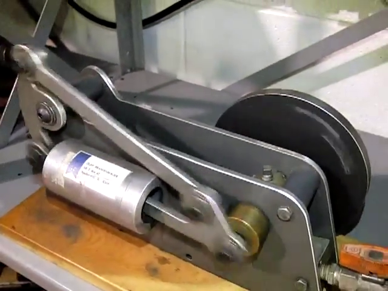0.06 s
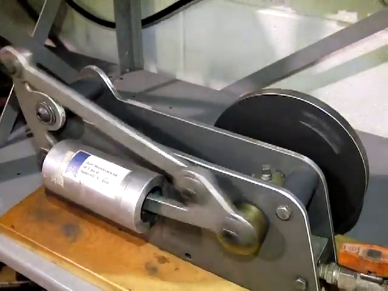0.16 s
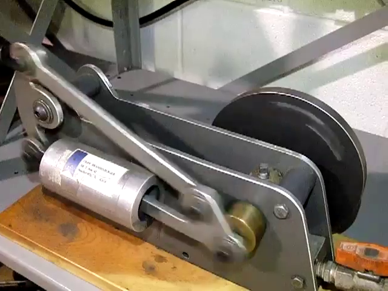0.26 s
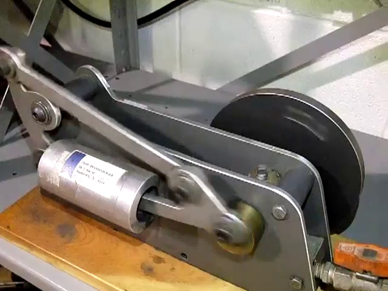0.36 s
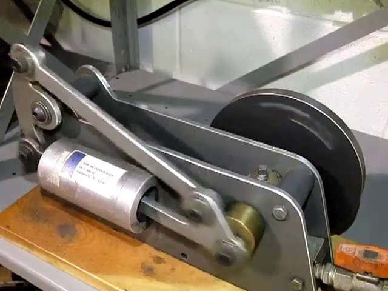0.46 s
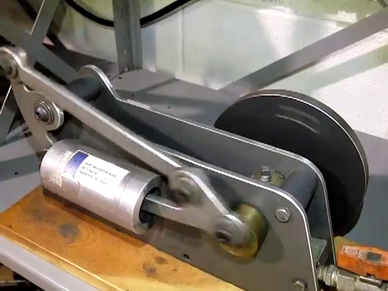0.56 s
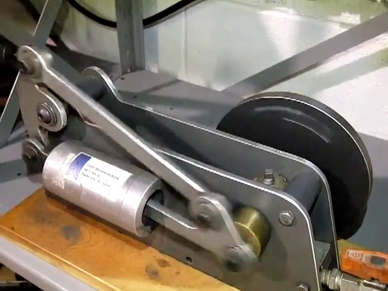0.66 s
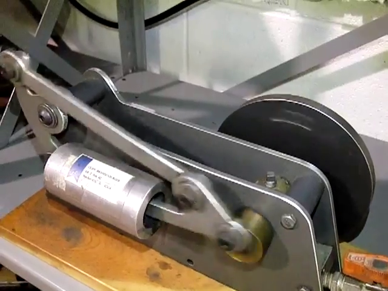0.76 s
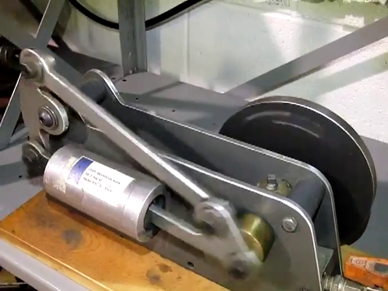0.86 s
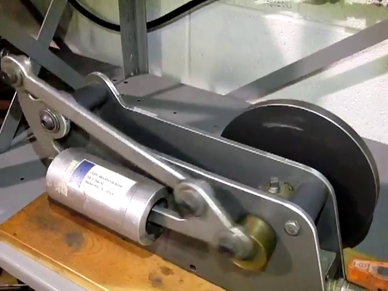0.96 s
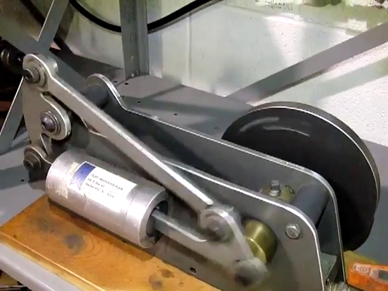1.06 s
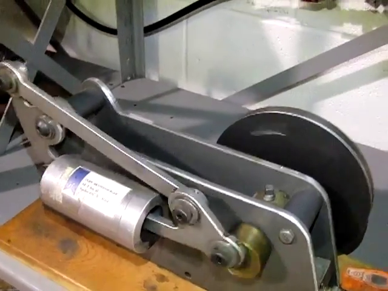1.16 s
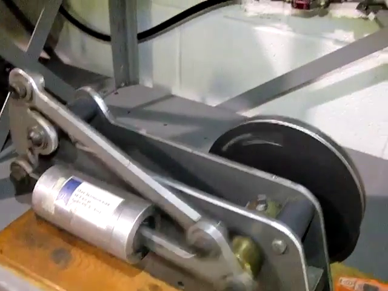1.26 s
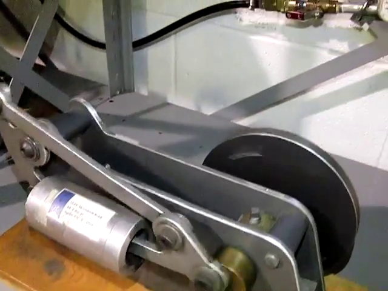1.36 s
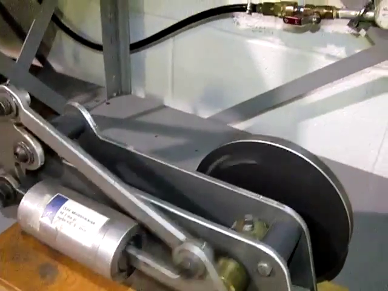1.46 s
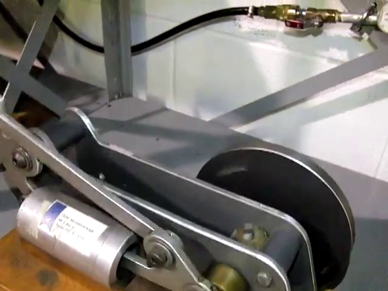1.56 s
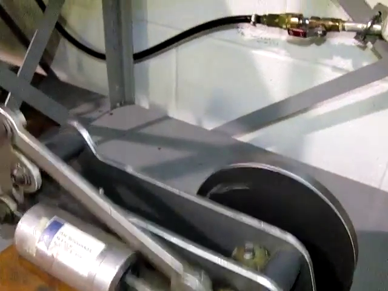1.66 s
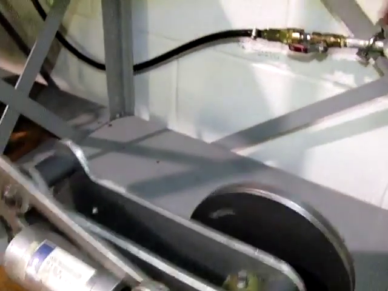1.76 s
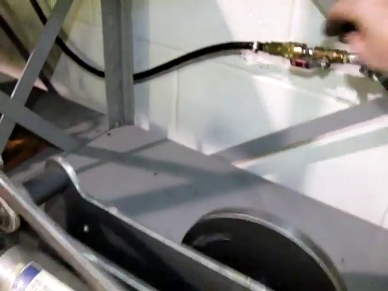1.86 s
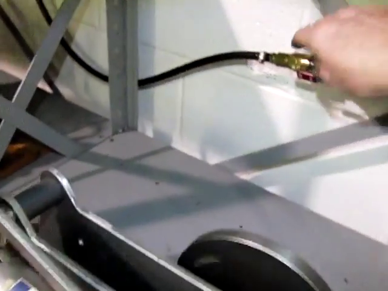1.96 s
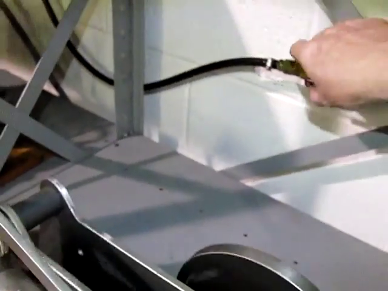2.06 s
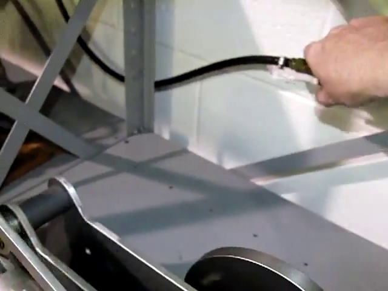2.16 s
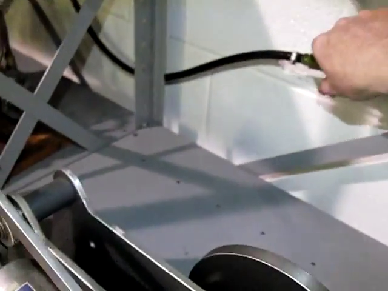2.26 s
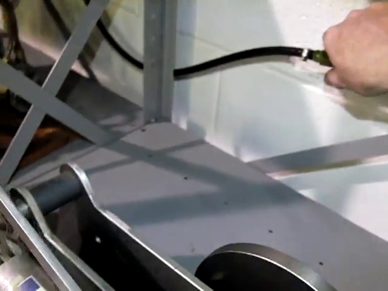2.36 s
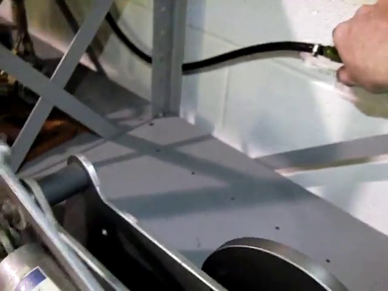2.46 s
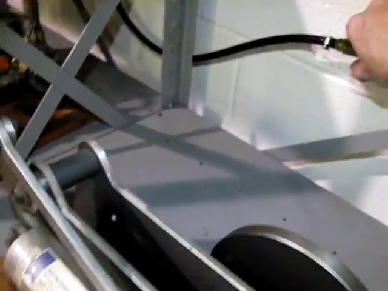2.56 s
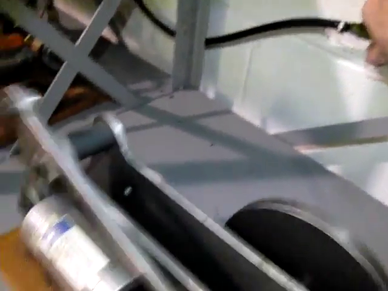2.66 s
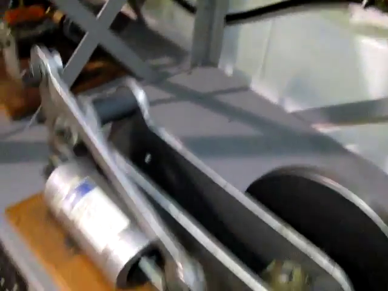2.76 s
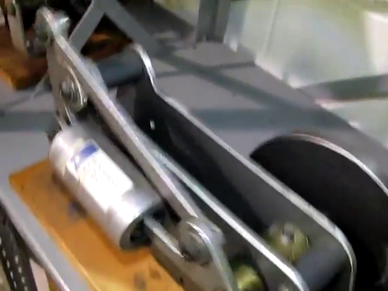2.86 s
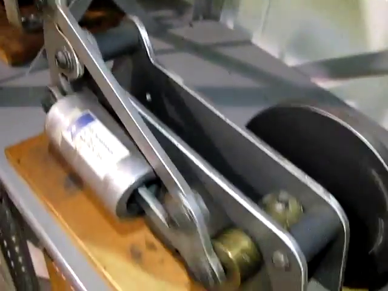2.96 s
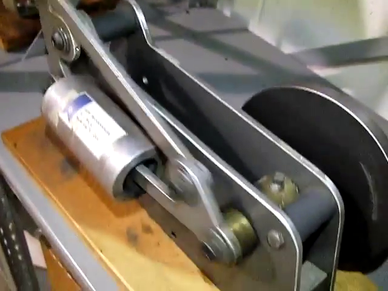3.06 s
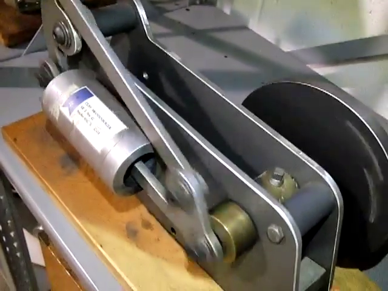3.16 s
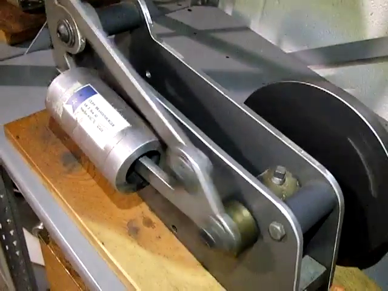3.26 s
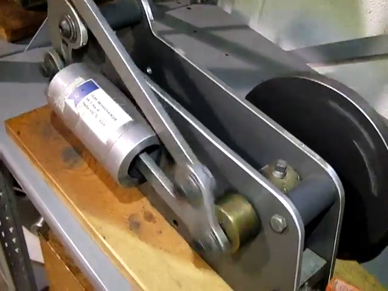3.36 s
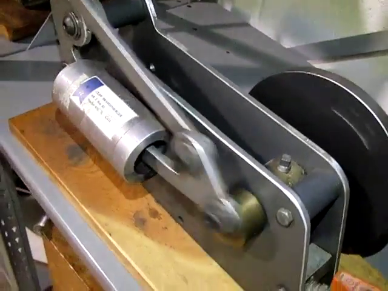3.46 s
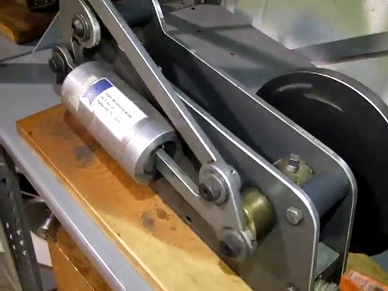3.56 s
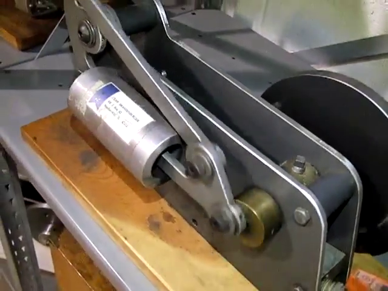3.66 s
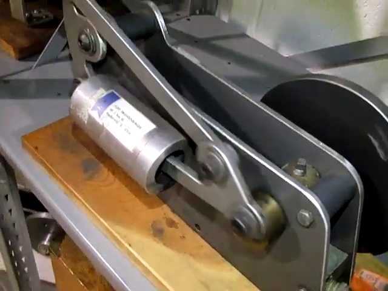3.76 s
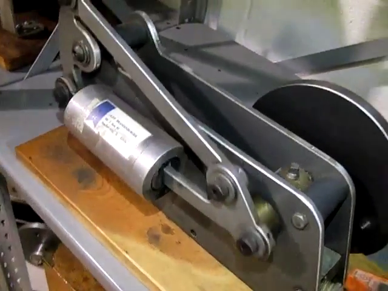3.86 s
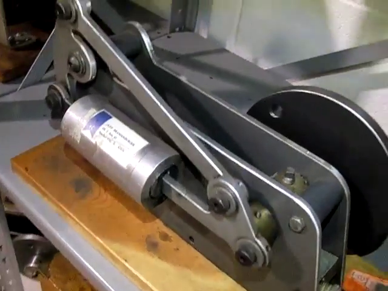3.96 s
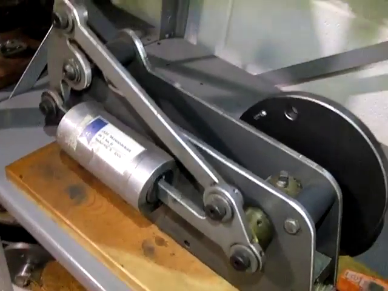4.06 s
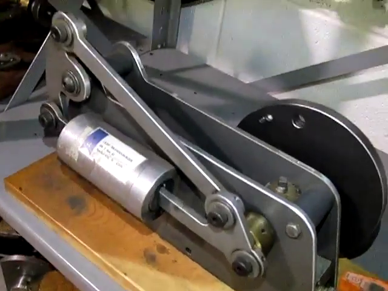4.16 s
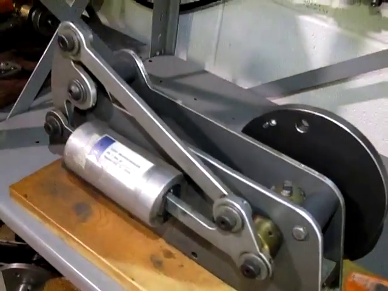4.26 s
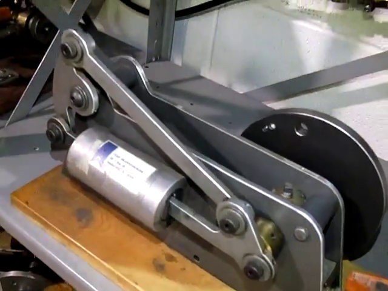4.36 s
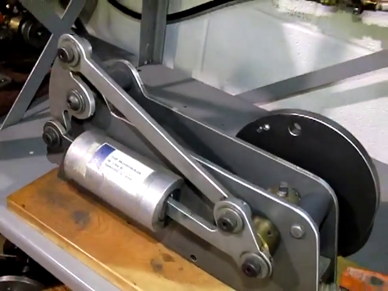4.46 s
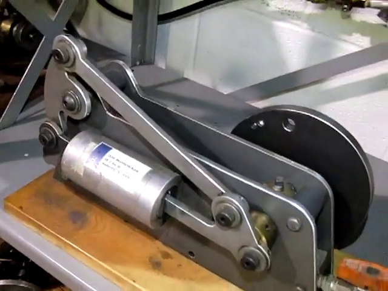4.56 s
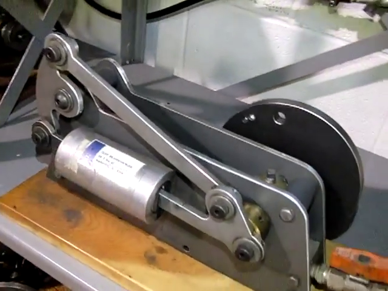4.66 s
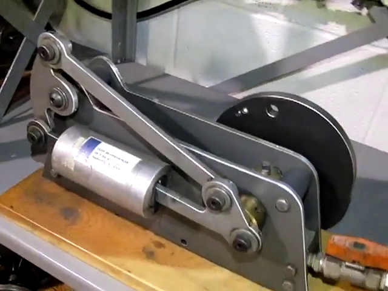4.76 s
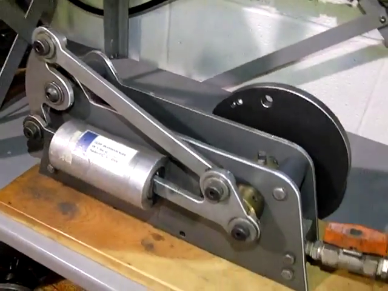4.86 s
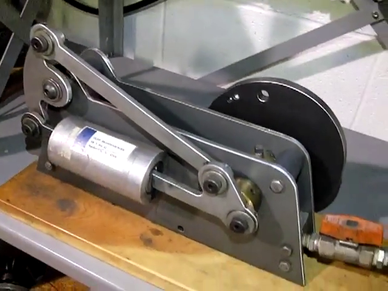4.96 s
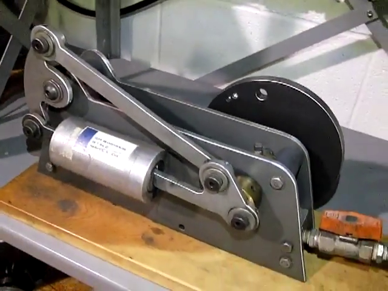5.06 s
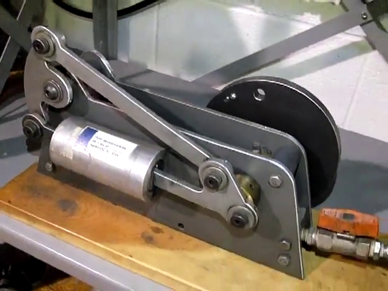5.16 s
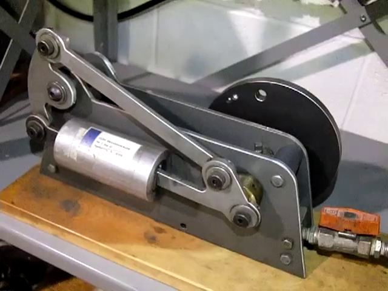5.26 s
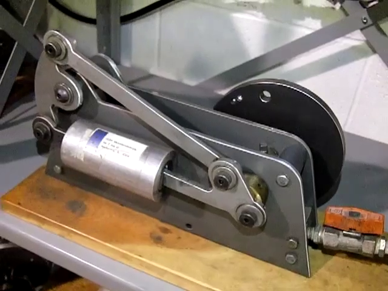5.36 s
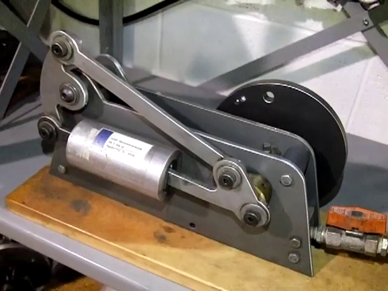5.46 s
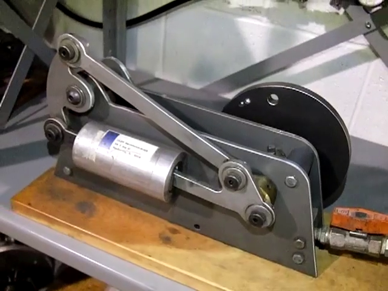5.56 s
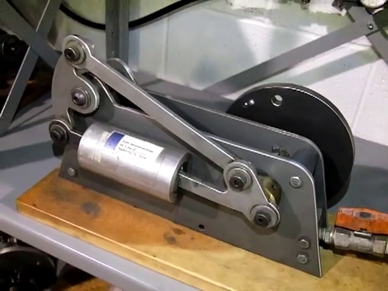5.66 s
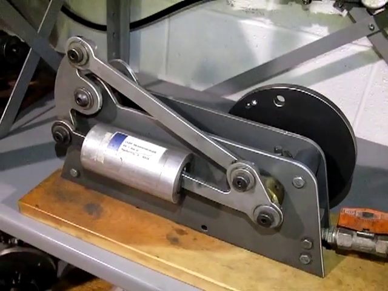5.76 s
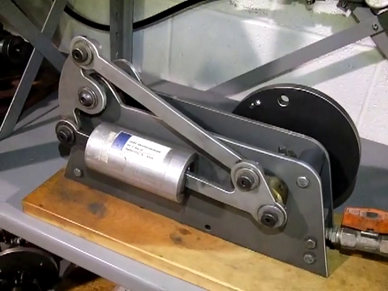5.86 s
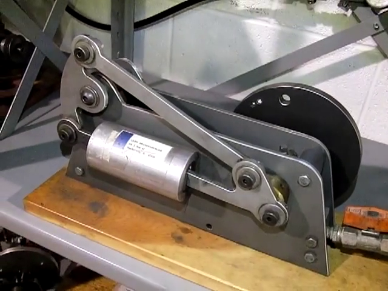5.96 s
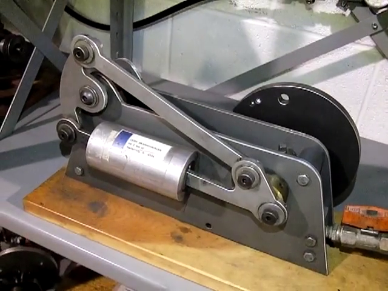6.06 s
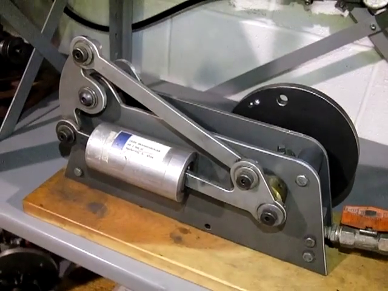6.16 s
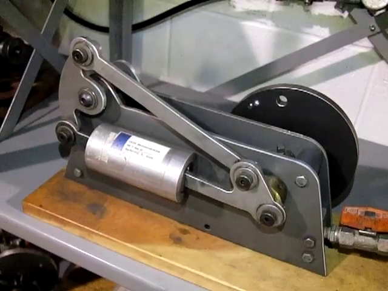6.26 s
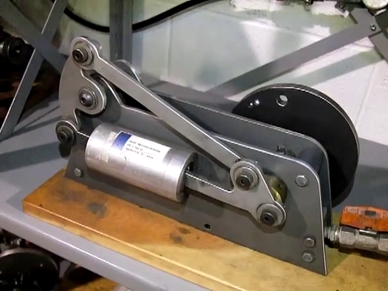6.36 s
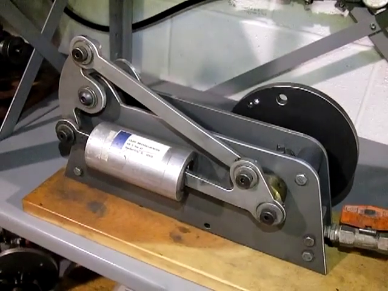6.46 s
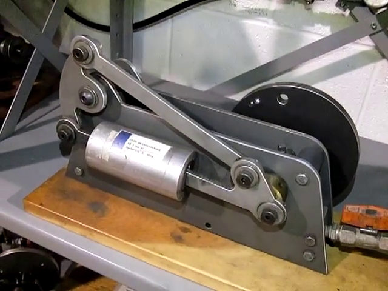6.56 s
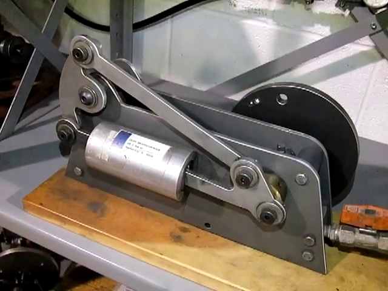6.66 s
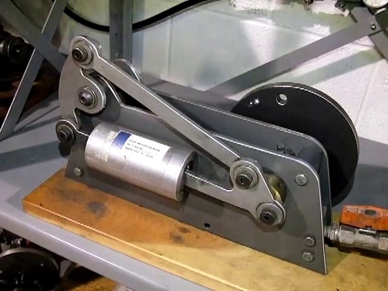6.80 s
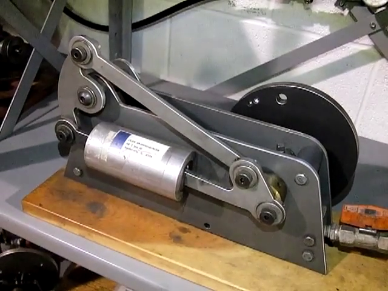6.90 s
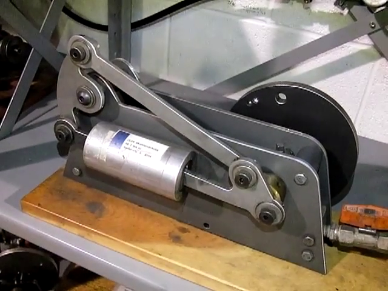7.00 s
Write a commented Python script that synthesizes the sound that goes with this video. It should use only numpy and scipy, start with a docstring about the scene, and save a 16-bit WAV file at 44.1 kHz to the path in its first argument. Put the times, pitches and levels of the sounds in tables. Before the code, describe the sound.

Close up in a small workshop, a single-cylinder air engine runs on a wooden bench, its loose steel linkage clattering almost five turns a second with rhythmic hisses and low bearing rumble. Around three and a half seconds the air is shut off; uneven knocks slow to a stop, a soft sigh escapes, then faint metal ticks sound over ventilation hum.

```python
"""In a humming workshop, a small single-cylinder air engine runs on a wooden bench, nearly five turns a second.
Each turn: a chattering blow of the loose linkage and lighter knocks, built from ringing steel and bench modes,
and hiss from valve and exhaust, built from coloured noise and breathy tones that the crank opens and closes.
The air is shut off, the flywheel coasts to rest with a few knocks, and a small steel part ticks (damped modes).
Bearings rumble, the bench drones, surfaces and walls answer; ventilation, lamp buzz and a thin whine go on."""
import sys
import numpy as np
from scipy import signal
from scipy.fft import rfft, irfft, next_fast_len
from scipy.io import wavfile
from scipy.ndimage import uniform_filter1d, map_coordinates

SR = 44100
rng = np.random.default_rng(int(sys.argv[2]) if len(sys.argv) > 2 else 0)


def wav_record(signal):
    """Record a signal, one row per channel, as 16-bit PCM in the file named by sys.argv[1]."""
    frames = np.transpose(np.atleast_2d(signal))
    bounded = np.clip(frames, -1, 1)
    # unit amplitude maps onto the largest positive 16-bit level
    quanta = np.round(bounded * 32767).astype(np.int16)
    wavfile.write(sys.argv[1], SR, quanta)


N = 310023

# the steady run: start of the first power stroke, length of a turn, full turns under air
FIRST_S, TURN_S, TURNS = -0.0123, 0.20663, 17
# the slowing flywheel: [t/s, turns past the steady run]
COAST_TURNS = [(3.601, 0.42), (3.705, .765), (3.78, 1), (3.83, 1.26), (4.03, 1.32)]
# knocks of every turn; the rod bounces once, the valve link also ticks twice:
# [joint, crank position/turn, level/dB, timing scatter/s]
TURN_KNOCKS = [("stroke", 0, 2.1, .0001), ("valve", .238, -15, .001), ("valve", .304, 1.8, .0002),
               ("rod", .427, -.3, .0007), ("rod", .53, -10.5, .0007), ("valve", .93, -15, 0.00101)]
BEAT_SCATTER_DB = .5  # from turn to turn
# knocks of the run-down: [joint, t/s, level/dB]
COAST_KNOCKS = [("stroke", 3.5035, .5), ("valve", 3.556, 5.3), ("rod", 3.602, 0), ("rod", 3.7415, -8),
                ("rod", 3.78, -9.5), ("rod", 3.825, -3.5), ("rod", 4.0325, -8)]
# contacts within a knock, as the play in the joint closes: [t/s from the knock's start, level/dB]
STROKE_CONTACTS = [(-.0014, -10.5), (.0002, -1.3), (.0022, 1.1), (.0047, -1), (.0089, -2.7), (.0103, 1.6),
                   (.0117, -4)]
VALVE_LINK_CONTACTS = [(0, 1), (.0037, -13.5)]
ROD_JOINT_CONTACTS = [(0, -4.3), (.003, -2.5)]
# ringing steel frame and links: [f/Hz, t60/s, stroke level/dB, valve link level/dB, rod level/dB]
FRAME_MODES = [(378.6, 0.095, -36.5, -32, -43), (436, 0.062, -36.5, -38, -31.5),
               (526, 0.074, -29, -26.5, -34), (670, 0.02, -37, -51, -22.5), (665, 0.078, -20.5, -34, -24.5),
               (707, 0.04, -45, -33.5, -26), (845, 0.038, -26.5, -24.5, -61), (956, 0.039, -19, -41, -27),
               (1131, 0.028, -33, -34, -19.5), (1230, 0.032, -26, -25, -25),
               (1309, 0.035, -15.5, -30.5, -21), (1391, 0.019, -19, -17, -18.5),
               (1578, 0.02, -38, -19.5, -29), (1756, 0.036, -22, -22, -22), (1815, 0.043, -17, -49, -20),
               (2050, 0.02, -24, -19, -27.5), (2147, 0.014, -16.5, -25, -43), (2190, 0.0083, -57, -43, -84),
               (2800, .02, -101, -54, -61), (3570, 0.027, -51, -29, -36)]
# the bench under the engine: [f/Hz, t60/s, stroke level/dB, valve link level/dB, rod level/dB]
BENCH_MODES = [(47.7, 0.1, -35, -52, -34), (93, 0.11, -68, -64, -64), (141.6, 0.18, -30, -46, -53),
               (207.2, 0.13, -25.5, -40, -33), (230, 0.066, -30, -80, -41), (256, 0.1, -26.5, -54, -39),
               (335.3, 0.3, -45, -61, -45)]

SHUT_S = 3.43  # the supply is shut and the pressure bleeds away
BLEED_DB_PER_S = 42  # how fast the leak and the singing die away
# air let through in every turn by drive stroke, valve changeover, return stroke and exhaust:
# [opens at/turn, rise/turns per 20 dB, hold/turns, fall/turns per 20 dB, bleed/dB per s,
#  valve hiss level/dB, inlet fizz level/dB, exhaust jet level/dB]
AIR_PUFFS = [(0.002, 0.06, .15, .14, 52, -23.8, -30.5, -48), (.425, .032, 0.014, .048, -3, -30.5, -33, -42),
             (0.639, .17, 0.21, 0.07, 30, -28.5, -48, -35.5), (.759, .055, .008, .045, 18, -36, -43, -16.3)]
# air that leaks between the puffs: [valve hiss level/dB, inlet fizz level/dB, exhaust jet level/dB]
LEAK_LEVELS = (-39.5, -52.5, -58)
# colours of valve hiss, inlet fizz and exhaust jet: [f/Hz, relative level/dB per Hz]
HISS_COLOUR = [(300, -31), (950, -19.5), (1400, -6), (2300, -9.5), (3200, 0), (3900, -3), (4500, -14),
               (4850, -18.5), (5200, -19), (7500, -46), (15000, -48)]
INLET_COLOUR = [(600, -26), (1400, -33), (2500, 0.5), (4400, -6), (5200, -4.5), (7600, -10), (9300, -4.5),
                (10000, 0.5), (10500, 7), (11300, 4), (12600, -0.5), (15500, -10.5)]
JET_COLOUR = [(800, -45), (1350, -5.5), (1700, -10), (3600, -9.5), (4500, -14.5), (5200, -15.5),
              (6500, -18.5), (7400, -20.5), (8700, -16.5), (10000, -11), (11100, -0.5), (12200, -17),
              (13300, -7.5), (15500, -25)]
# resonances of the exhaust hole, where the jet whistles: [f/Hz, width/Hz, relative level/dB]
WHISTLE_MODES = [(3720, 310, -4.5), (6000, 83, -7), (11060, 580, -3.5)]
# the air column in the cylinder sinks in pitch during each stroke:
# [from/turn, length/turns, start f/Hz, end f/Hz, level/dB]
COLUMN_GLIDES = [(.01, .28, 2400, 2245, -34.5), (.54, .28, 2495, 1750, -30.5)]
# the valve slot sings upward on the drive stroke, downward on the return:
# [from/turn, length/turns, start f/Hz, end f/Hz, level/dB]
SLOT_GLIDES = [(.1, .16, 4135, 4455, -33), (.62, .32, 4056, 3405, -34)]
# the last air sighs out of the cylinder:
# [t/s, rise/s per 20 dB, hold/s, fall/s per 20 dB, valve hiss level/dB, inlet fizz level/dB]
LAST_SIGH = (3.87, 0.3, .045, .07, -44, -49.5)

# the bearings fall quiet as the flywheel slows: [from t/s, fade/dB per s]
BEARING_FADE = (3.5, 44)
# colours of the bearings' repeating roughness and chance rumble: [f/Hz, relative level/dB per Hz]
ROUGH_COLOUR = [(25, -16), (48, -12), (80, -6), (140, 1.5), (220, -2.0), (680, -3.0), (950, -5.5),
                (1400, -8), (2400, -12.0), (5000, -51)]
CHANCE_COLOUR = [(25, 1), (50, -15), (200, -2), (700, -6), (2500, -2), (5000, -36)]
# the rocking engine keeps the bench top droning until it slows; level before the engine's closeness gain
DRONE_HZ, DRONE_DB, DRONE_END_S, DRONE_FADE_DB_PER_S = 140.33, -34, 3.65, 54
# a small steel part snaps, rattles and settles: [t/s, level/dB]
TICK_TOUCHES = [(4.8955, -25), (4.898, -29.5), (4.9055, -28), (4.9252, -33), (4.932, -39), (5.569, -48),
                (5.75, -49.5), (6.23, -48)]
# how that part rings: [f/Hz, t60/s, level/dB]
TICK_MODES = [(830, 0.029, -11.5), (990, 0.036, -6), (1400, 0.03, -10), (1830, 0.079, -1.5),
              (2050, 0.047, -1), (2404, 0.042, 3), (2580, 0.052, 3), (3100, 0.053, -2), (3500, 0.044, -8),
              (5970, .02, -22), (11300, .04, -18)]

# the engine comes closer to the ear: [t/s, level/dB]
CLOSER = [(0, -1.44), (1.7, -1.44), (2.3, 0), (3.3, 1.7)]
# hard surfaces beside the engine: [delay to left/s, delay to right/s, level/dB]
SURFACES = [(.0007, .0011, -21), (.0019, .0014, -21), (.0031, .0025, -22)]
# how long the workshop's walls answer: [f/Hz, t60/s]
WALL_DECAY = [(150, 0.21), (1500, 0.04), (10000, 0.066)]
WALLS_DB, SWAYS_PER_S = -12, 4  # the room's answer, and how fast it shifts

# workshop ventilation: [f/Hz, relative level/dB per Hz]
VENT_COLOUR = [(20, -10), (42, 8.5), (62, -1), (105, 1), (140, -6), (220, -9), (300, -15), (480, -21.5),
               (900, -23), (1500, -25.5), (2400, -27.5), (4000, -31.5), (15500, -36)]
# swell of the ventilation's rumble: [t/s, level/dB]
RUMBLE_SWELL = [(0, -56), (4.5, -51), (6.5, -48.5), (6.8, -42.5)]
# colour of that rumble: [f/Hz, relative level/dB per Hz]
RUMBLE_COLOUR = [(40, -21), (70, -2.5), (110, 4.5), (135, -25.5), (220, -38), (1000, -82)]
HUM_HZ = 120.03  # first harmonic of hum and buzz
# transformer hum and lamp buzz: [harmonic number, level/dB]
HUM_HARMONICS = [(1, -54), (2, -64), (3, -49), (4, -72.5), (10, -64.5), (12, -74), (14, -64), (15, -66),
                 (16, -65.5), (17, -67), (18, -70.5), (19, -64), (21, -70.5)]
# a thin electrical whine: [f/Hz, level/dB]
THIN_WHINE = (15734, -68)

# the two microphone ports: [f/Hz, phase of left behind right/rad, left minus right level/dB]
PORT_DIFFERENCE = [(60, 0.032, -1), (200, 0.16, 0), (430, 0.5, 0.5), (680, 0.4, 2), (1226, 1.81, 1.5),
                   (1920, 2.035, -3), (3800, 2.608, -0.5), (11000, 2.64, -2)]
# dips in the microphone's response: [f/Hz, width/Hz]
MIC_DIPS = [(2840, 606), (2890, 80), (5000, 110)]
TOP_HZ = 15800  # nothing passes from here up


def linkage():
    """Three joints knock as they take up play: a stroke blow a turn, a valve knock with two ticks, a rod with a bounce."""
    stroke = knocks(blows("stroke"), STROKE_CONTACTS, axis=2)
    valve = knocks(blows("valve"), VALVE_LINK_CONTACTS, axis=3)
    rod = knocks(blows("rod"), ROD_JOINT_CONTACTS, axis=4)
    return stroke + valve + rod


def blows(joint):
    """(s, dB) of one joint's knocks: nearly the same crank positions in every turn, then the run-down."""
    events = []
    for name, turn, db, scatter_s in TURN_KNOCKS:
        if name != joint:
            continue
        for k in range(TURNS):
            s = FIRST_S + (k + turn) * TURN_S + scatter_s * rng.normal()
            events.append((s, db + BEAT_SCATTER_DB * rng.normal()))
    return events + [(s, db) for name, s, db in COAST_KNOCKS if name == joint]


def knocks(events, contacts, axis):
    """Each knock is a few quick contacts on the frame and one push on the bench, nearly alike from turn to turn."""
    out = np.zeros(N)
    for s, db in events:
        steel = ring(FRAME_MODES, axis, seconds=1 / 8, attack=0.00031, scatter_db=1.23)
        for delay, contact_db in contacts:
            late, harder_db = rng.normal(0, [.00004, .6])
            add(out, s + delay + late, amp(db + contact_db + harder_db) * steel)
        bench = ring(BENCH_MODES, axis, seconds=.5, attack=0.0012, scatter_db=0.5)
        add(out, s, amp(db) * bench)
    return out


def ring(modes, axis, seconds, attack, scatter_db):
    """Damped modes after one contact; axis picks the level column, and each pitch shifts a little."""
    t = np.arange(int(seconds * SR)) / SR
    table = np.transpose(modes)[:, :, None]
    strength, detune = rng.standard_normal((2, len(modes), 1))
    level = table[axis] + scatter_db * strength
    hz = table[0] * (1 + .005 * detune)
    decay = amp(level - 60 * t / table[1])
    return np.sum(decay * np.sin(2 * np.pi * hz * t), 0) * (1 - np.exp(-t / attack))


def crank():
    """Position of the crank within its turn, 0-1: even speed, then coasting."""
    running = [(FIRST_S, 0), (FIRST_S + TURNS * TURN_S, TURNS)]
    coasting = [(s, TURNS + turns) for s, turns in COAST_TURNS]
    return curve(running + coasting) % 1


def air():
    """The crank opens the ports in turn: turbulent inlet, valve and exhaust flow, and singing cavities."""
    angle = crank()
    supply = fading(SHUT_S, BLEED_DB_PER_S)
    valve_flow, inlet_flow, jet_flow = flows(angle, supply)
    hiss = valve_flow * patchy(noise(HISS_COLOUR), depth_db=3.0)
    inlet = inlet_flow * amp(1.2 * wobble(90)) * noise(INLET_COLOUR)
    singing = glides(angle, COLUMN_GLIDES, width_hz=200) + glides(angle, SLOT_GLIDES, width_hz=200)
    return hiss + inlet + exhaust(jet_flow) + supply * singing


def flows(angle, supply):
    """Gains of valve, inlet and jet: the powers of the leak and the four puffs add up."""
    power = np.outer(amp(LEAK_LEVELS), supply) ** 2
    for opens, rise, hold, fall, bleed, *levels_db in AIR_PUFFS:
        since = (angle - opens + .5) % 1 - .5  # turns since opening, wrapped to the nearest
        opening = puff(since, rise, hold, fall)
        power = power + np.outer(amp(levels_db), opening * fading(SHUT_S, bleed)) ** 2
    return np.sqrt(power)


def exhaust(jet_flow):
    """A jet of noise excites the exhaust hole, whose whistle grows with the square of the flow."""
    flow = jet_flow * amp(0.4 * wobble(60))

    def hole(f):
        return sum(amp(db) * 1j * f * w / (c * c - f * f + 1j * f * w) for c, w, db in WHISTLE_MODES)

    whistle = unit(filtered(rng.standard_normal(N), hole)) * flow ** 2 / flow.max()
    return flow * noise(JET_COLOUR) + amp(-3.5) * whistle


def puff(since, rise, hold, fall):
    """Attack, hold and release of an opening; rise and fall are the spans of a 20 dB change."""
    before = np.maximum(-since, 0) / rise
    after = np.maximum(since - hold, 0) / fall
    return amp(-20 * (before + after))


def patchy(x, depth_db):
    """Turbulence: short patches of a few hundred hertz swell and fade."""
    z = signal.stft(x, nperseg=512)[2]
    field = uniform_filter1d(rng.standard_normal(z.shape), size=3, axis=0)
    field = uniform_filter1d(field, size=4, axis=1)
    return unit(signal.istft(z * amp(depth_db * unit(field)), nperseg=512)[1][:N])


def glides(angle, rows, width_hz):
    """Breathy tones that swell and fade once a turn while their pitch bends ever faster."""
    out = np.zeros(N)
    for start, length, start_hz, end_hz, db in rows:
        u = np.clip((angle - start) / length, 0, 1)
        hz = (start_hz + (end_hz - start_hz) * u ** 2) * (1 + .02 * wobble(4.8))
        out += amp(db) * np.sin(np.pi * u) * narrow(hz, width_hz)
    return out


def narrow(hz, width_hz):
    """A breathy tone that follows a pitch curve: two carriers in quadrature, each with a random envelope."""
    phase = 2 * np.pi * np.cumsum(hz) / SR
    return wobble(width_hz) * np.cos(phase) + wobble(width_hz) * np.sin(phase)


def sigh():
    """What air is left escapes through valve and inlet as the piston comes to rest."""
    s, rise, hold, fall, hiss_db, inlet_db = LAST_SIGH
    breath = amp(hiss_db) * noise(HISS_COLOUR) + amp(inlet_db) * noise(INLET_COLOUR)
    return puff(np.arange(N) / SR - s, rise, hold, fall) * breath


def bearings():
    """The same rough surfaces pass every turn, loudest under the power stroke, over some chance rumble."""
    angle = crank()
    surface = noise(ROUGH_COLOUR)
    repeating = map_coordinates(surface, [SR + angle * TURN_S * SR])  # the same stretch read every turn
    load_db = 3.3 * np.cos(2 * np.pi * (angle - .2))
    rumble = amp(-41.5) * noise(CHANCE_COLOUR)
    return fading(*BEARING_FADE) * amp(load_db) * (amp(-32.5) * repeating + rumble)


def drone():
    """The bench's main resonance, kept going in step with the strokes."""
    t = np.arange(N) / SR - FIRST_S
    level = fading(DRONE_END_S, DRONE_FADE_DB_PER_S) * amp(DRONE_DB + 0.61 * wobble(19))
    return np.sqrt(2) * level * np.sin(2 * np.pi * DRONE_HZ * t)


def tick():
    """Each touch of the small part is a short crack of noise and a brief ring of its modes."""
    t, out = np.arange(SR // 8) / SR, np.zeros(N)
    for s, db in TICK_TOUCHES:
        metal = ring(TICK_MODES, axis=2, seconds=1 / 8, attack=.0003, scatter_db=1.2)
        crack = amp(db - 12 - 60 * t / 0.017) * rng.standard_normal(len(t))
        add(out, s, amp(db - 3.5) * metal)
        add(out, s, crack)
    return out


def fading(start_s, db_per_s):
    """Gain of an engine sound: follows the closeness of the engine, and dies away from start_s on."""
    return amp(curve(CLOSER) - db_per_s * np.maximum(np.arange(N) / SR - start_s, 0))


def nearby(x):
    """Quick reflections that reach the two ports at different moments."""
    def echoes(hz):
        return sum(amp(db) * np.exp(-2j * np.pi * np.outer([left, right], hz))
                   for left, right, db in SURFACES)

    return filtered(x, echoes)


def walls(x):
    """The workshop's short answer: decaying noise, different at each port, that starts 5 ms late."""
    hz, t, z = signal.stft(rng.standard_normal((2, SR // 2)), SR, nperseg=256)
    decay = amp(-60 * t / along(WALL_DECAY, hz)[:, None])
    tail = signal.istft(z * decay, SR, nperseg=256)[1]
    tail = np.pad(tail, ((0, 0), (SR // 200, 0)))
    return signal.fftconvolve(x[None], tail / np.linalg.norm(tail[0]), axes=1)[:, :N]


def reflections(engine):
    """Surfaces and walls answer the engine above its bass; the wall answer sways between two tails."""
    above_bass = filtered(engine, lambda hz: hz ** 2 / (hz ** 2 + 400 ** 2))
    sway = 2 * wobble(SWAYS_PER_S)
    far = walls(above_bass * np.cos(sway)) + walls(above_bass * np.sin(sway))
    return nearby(above_bass) + amp(WALLS_DB) * far


def ventilation():
    """Moving air as coloured noise that wavers in level, over a low rumble that swells."""
    vent = amp(-44.5 + 1.6 * wobble(6.6)) * noise(VENT_COLOUR)
    return vent + amp(curve(RUMBLE_SWELL)) * noise(RUMBLE_COLOUR)


def diffuse_air():
    """Ventilation noise from all around, independent at the two ports."""
    pair = np.array([noise(VENT_COLOUR), noise(VENT_COLOUR)])
    return amp(-51.5) * filtered(pair, lambda hz: hz / np.hypot(hz, 60))


def hum():
    """Mains harmonics from a transformer and the lamps, and a faint high whine."""
    t = np.arange(N) / SR
    phase = 2 * np.pi * HUM_HZ * t + 0.018 * wobble(1.85)
    lines = sum(amp(db) * np.sin(round(k) * phase + rng.uniform(0, 2 * np.pi)) for k, db in HUM_HARMONICS)
    whine_hz, whine_db = THIN_WHINE
    whine = amp(whine_db) * np.sin(2 * np.pi * whine_hz * t)
    return np.sqrt(2) * (lines + whine) * amp(.6 * wobble(3))


def ports(x):
    """The stereo microphone hears bass nearly alike and treble nearly in opposite phase."""
    def half(hz):
        gain = amp(along(PORT_DIFFERENCE, hz, axis=2) / 2)
        return gain * np.exp(-.5j * along(PORT_DIFFERENCE, hz))

    return filtered(x, lambda hz: np.array([half(hz), 1 / half(hz)]))


def amp(db):
    """Decibels to gain."""
    return 10 ** (np.asarray(db) / 20)


def unit(x):
    """Scaled to rms 1."""
    return x / np.sqrt(np.mean(x ** 2) + 1e-20)


def along(points, hz, axis=1):
    """One column of a frequency table, read on a log axis."""
    table = np.transpose(points)
    return np.interp(np.log(hz + 1), np.log(table[0] + 1), table[axis])


def curve(rows):
    """(s, value) rows as one value per sample."""
    return np.interp(np.arange(N) / SR, *np.transpose(rows))


def wobble(rate):
    """A smooth random curve, rate knots a second."""
    knots = rng.standard_normal(int(N * rate / SR) + 4)
    return map_coordinates(knots, [np.arange(N) * rate / SR])


def filtered(x, response):
    """x times a complex response of frequency."""
    m = next_fast_len(N + SR // 2)
    return irfft(rfft(x, m) * response(np.fft.rfftfreq(m, 1 / SR)), m)[..., :N]


def noise(spectrum):
    """Coloured noise of rms 1."""
    return unit(filtered(rng.standard_normal(N), lambda hz: amp(along(spectrum, hz))))


def add(track, s, sound):
    """Mix a sound into a track at a time."""
    start = round(s * SR)
    part = sound[max(-start, 0):N - start]
    track[max(start, 0):][:len(part)] += part


def scene():
    """Engine, its shifting reflections, and the workshop's background."""
    engine = linkage() + air() + sigh() + bearings() + drone() + tick()
    direct = ports(engine + ventilation() + hum())
    return direct + reflections(engine) + diffuse_air()


def record(dry):
    """The microphone's bass cut, dips and band limit."""
    def dips(f):
        return np.prod([(c * c - f * f) / (c * c - f * f + 1j * f * w) for c, w in MIC_DIPS], axis=0)

    def bass_cut(f):
        return f ** 3 / np.hypot(f ** 3, 36 ** 3)

    return filtered(dry, lambda hz: bass_cut(hz) * dips(hz) * (hz < TOP_HZ))


dry = scene()
out = record(dry)
wav_record(out)
```